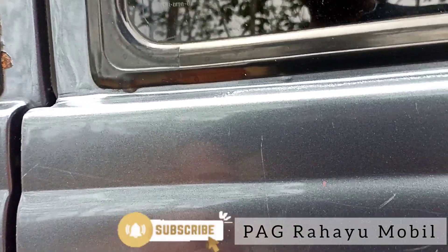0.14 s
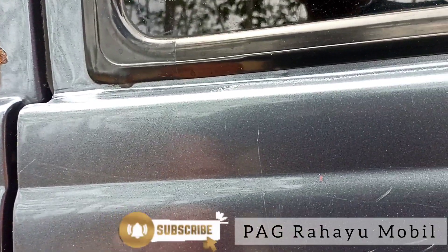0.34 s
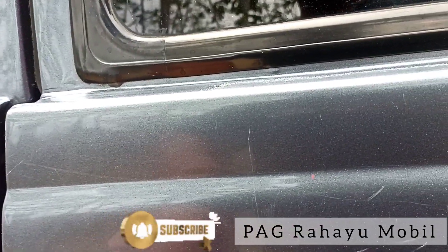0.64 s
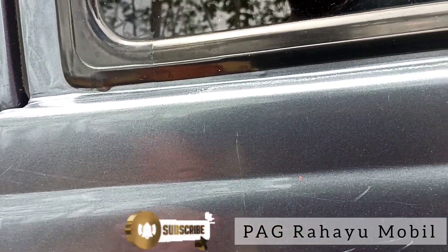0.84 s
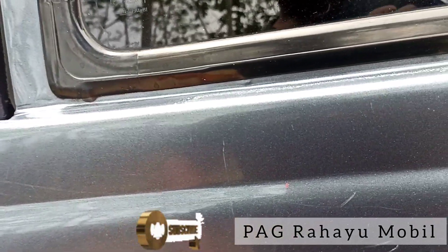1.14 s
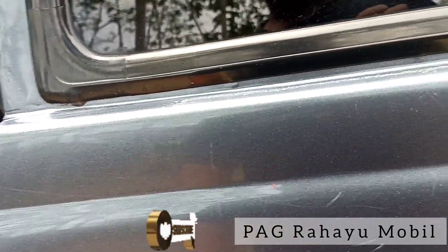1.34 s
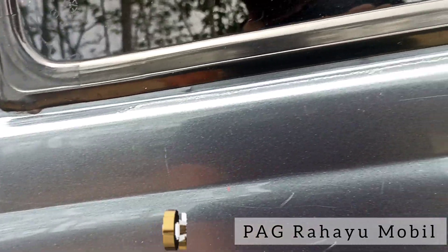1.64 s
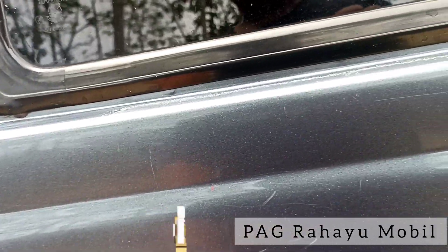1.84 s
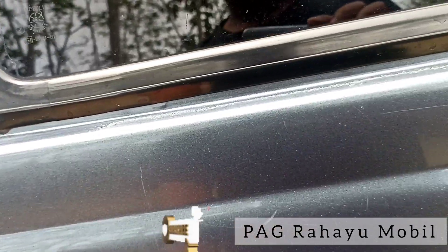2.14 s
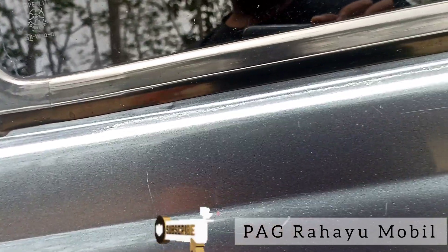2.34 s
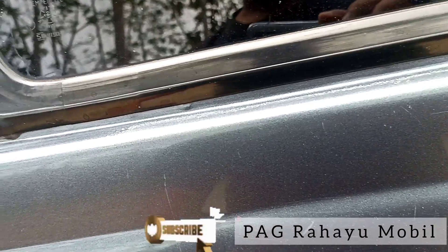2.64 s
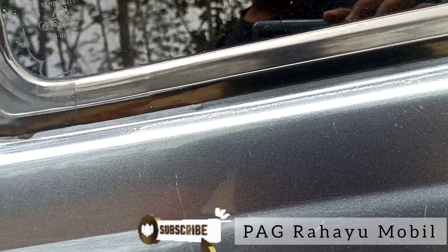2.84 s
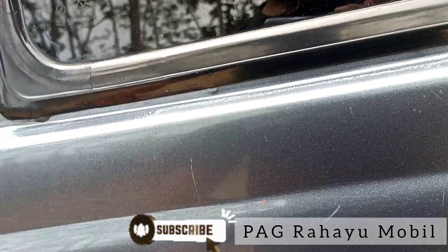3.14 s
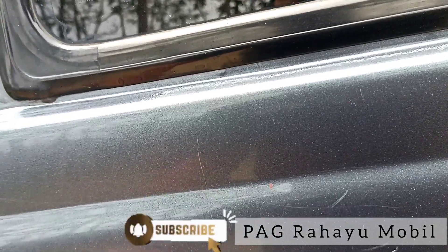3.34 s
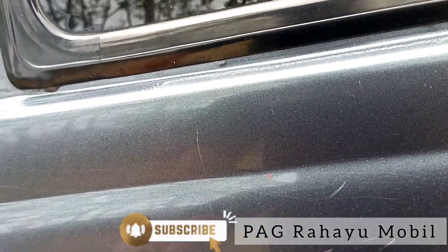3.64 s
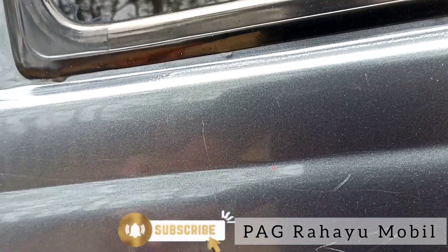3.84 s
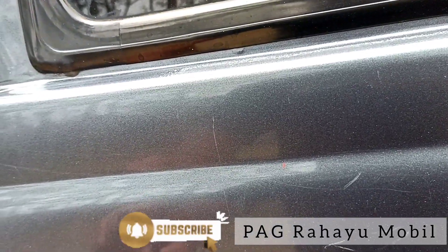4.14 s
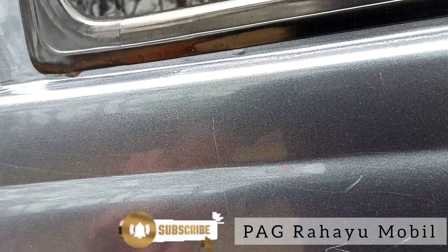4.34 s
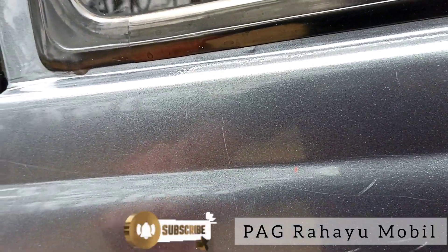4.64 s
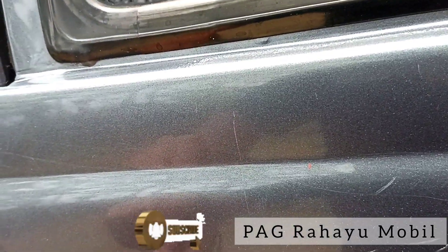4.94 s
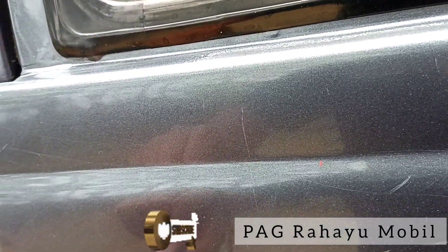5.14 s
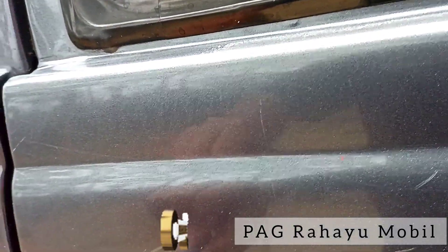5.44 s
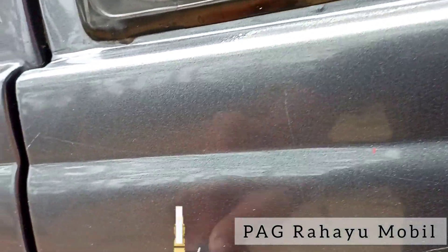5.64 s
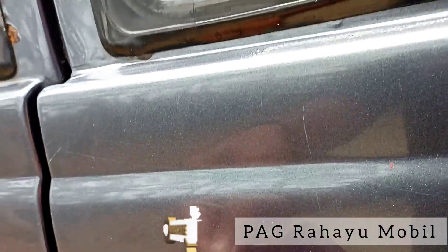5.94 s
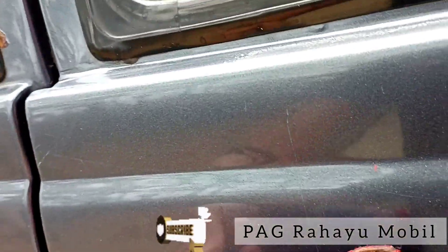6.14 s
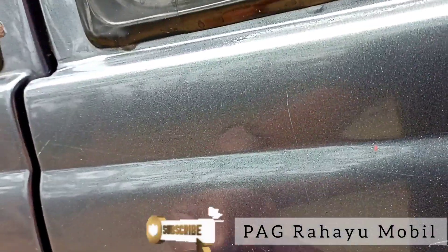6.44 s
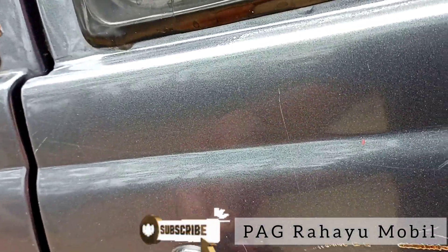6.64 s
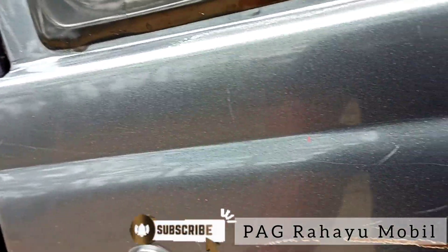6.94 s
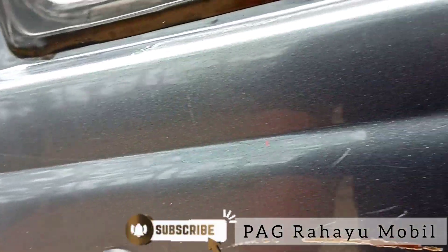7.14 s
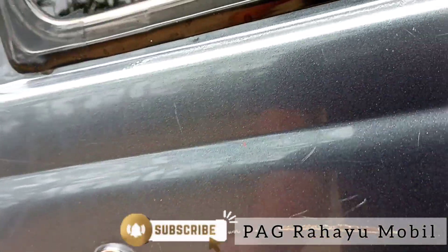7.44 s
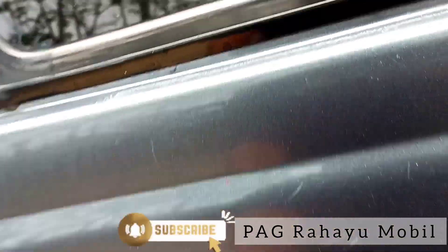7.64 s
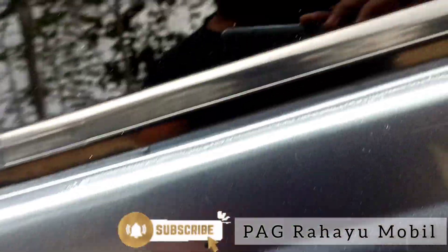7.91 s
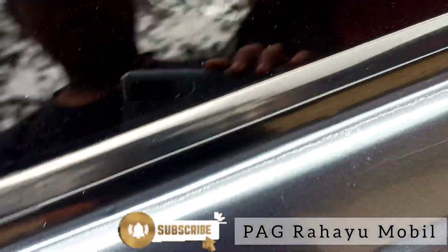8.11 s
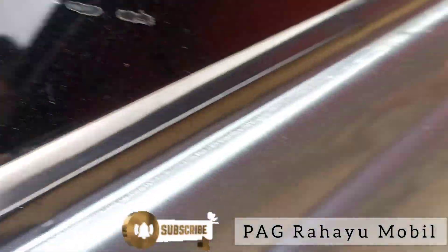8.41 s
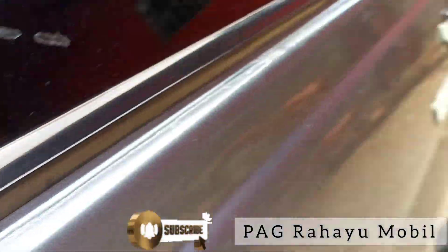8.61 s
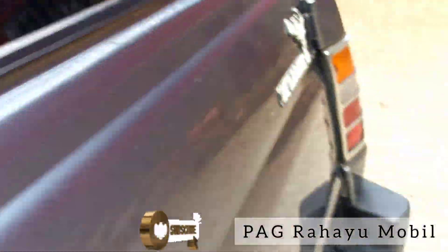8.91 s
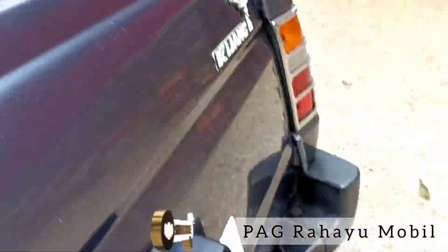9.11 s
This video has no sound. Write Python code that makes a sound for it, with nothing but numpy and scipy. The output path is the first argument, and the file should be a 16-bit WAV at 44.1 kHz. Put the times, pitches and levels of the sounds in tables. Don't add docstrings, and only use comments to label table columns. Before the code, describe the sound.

Close metallic clacks and booming door-panel blows come in bursts with quiet gaps, handle rubbing and creaking, with distant traffic and sparse faint birdsong behind.

```python
import sys
import numpy as np
from scipy import signal
from scipy.fft import rfft, irfft
from scipy.io import wavfile
from scipy.ndimage import uniform_filter1d

SR = 44100
rng = np.random.default_rng(int(sys.argv[2]) if len(sys.argv) > 2 else 0)


def decibels_to_gain(level_db):
    exponent = np.asarray(level_db, float) / 20
    return 10 ** exponent


def transcribe(u):
    v = np.clip(np.atleast_2d(u).T, -1, 1)
    q = np.round(v * 32767).astype(np.int16)
    wavfile.write(sys.argv[1], SR, q)


N = 408807

# start_s, peak_db, brightness_db, ring_hz, ring_time_factor
CLICKS = [(0.849, -33.5, -4, 3600, 0.85), (1.672, -25, 2, 5830, 0.38), (1.8227, -31.5, -16, 1300, .9),
          (2.2128, -19, -6.5, 2240, 1.4), (2.262, -14, -4, 800, 0.83), (2.6882, -47, 13, 6500, .4),
          (4.2723, -16, -7.5, 5400, 0.63), (4.398, -21, -14, 2120, 0.91), (4.4152, -20.5, -19, 1610, 1.2),
          (4.664, -16.5, -6.5, 1590, .7), (4.7458, -32.5, -20, 1050, .9), (4.812, -22.5, -9.5, 2040, 1.15),
          (4.887, -37, -11, 3490, .9), (5.2445, -36, -16, 1330, .6), (5.8366, -19, -13.5, 2850, 1),
          (6.05, -34, -43, 1380, 1.1), (6.4113, -32.5, -8.5, 1360, 0.79), (6.461, -15, -19.5, 2880, 0.76),
          (6.559, -32, -14, 1000, 1.1), (6.8626, -47, 3, 3500, .6), (6.9357, -42.5, -4, 2100, .6),
          (7.014, -37, -11, 2500, 0.87), (7.1544, -42, -8, 3300, .8), (7.528, -11.5, -18, 2100, 1.2),
          (7.6457, -11.5, -27, 1380, 1.06), (8.507, -39, -25, 1030, 0.55), (8.6063, -44, -30, 1200, .9),
          (8.9479, -33.5, 0, 2061, .6), (8.972, -18, -4, 1390, 0.83), (9.1368, -36.5, -28, 1034, 1)]
# start_s, peak_db, brightness_db, ring_hz
SLIDES = [(0.889, -33.5, -10, 2080), (1.603, -35.5, -22, 960), (1.7063, -36.5, -23, 1530),
          (1.738, -37.5, -9, 1530), (2.164, -34.5, -21, 1050), (2.8665, -45, -13, 1050),
          (4.4588, -37, -24, 1780), (4.641, -25.5, -27, 1800), (4.6554, -20.5, -17, 3580),
          (4.6933, -28.5, -17, 1040), (4.7837, -29.5, -40, 2050), (5.1269, -28, -24, 1030),
          (5.1368, -26, -4.5, 2100), (5.695, -34.5, -27, 1650), (6.1064, -29.5, -19, 1310),
          (6.117, -25.5, -20, 3300), (6.1278, -30.5, -19, 1350), (6.584, -40.5, -14, 1960),
          (7.23, -39, -10, 1004), (7.265, -37, -12, 1000), (7.286, -32, -4, 1130),
          (7.4186, -40.5, -9, 2200), (7.511, -26, -17, 920), (7.562, -19, -15, 1590),
          (7.5682, -10, -21, 2000), (7.575, -23, 2, 1630), (7.607, -22, -6.5, 1150),
          (7.895, -45.5, -26, 1030), (8.1212, -45, -9, 990), (8.797, -35.5, -10, 2280),
          (8.9943, -28.5, -26, 1260)]
# pitch_hz, level_db, t60_s
LATCH_MODES = [(1066, -4, 0.067), (1593, -0.5, 0.06), (1850, -2.5, 0.046), (2000, -5.5, 0.078),
               (2300, -7, 0.1), (3353, -6.5, 0.026), (3490, -1, 0.047), (3700, -1, 0.03),
               (2874, -8.5, 0.061), (723, -13, 0.1), (5690, -5, 0.035), (6500, -22, 0.055)]
# pitch_hz, level_db (per Hz)
CRACK_COLOUR = [(500, -14), (900, -3), (1300, -5), (1800, -1), (2300, -7), (2800, -7), (3500, -1),
                (4300, -16), (5000, -13), (5700, -7), (9000, -26), (12500, -18), (16400, -24)]
# pitch_hz, t60_factor
TAIL_FACTOR = [(700, 2.27), (2000, 0.93), (5000, 0.69), (9000, 0.75), (16000, 0.15)]
TOP_DB, TOP_SLOPE = -8.5, 1
CLICK_T60, SLIDE_T60 = 0.09, 0.063
BRIGHT_DAMPING = 0.019
SNAP_SHORTER = 0.07

# start_s, peak_db, ring_hz, ring_time_factor, extra_hardness_db
KNOCKS = [(1.446, -30, 235, 1, -2.5), (1.601, -19.5, 142, 1, -1), (1.672, -11.5, 298, 0.57, -1.5),
          (1.821, -19, 673, 0.64, -2), (2.211, -17.5, 165, 0.97, 1), (2.261, -1, 623, 0.79, -2),
          (2.817, -31.5, 170, 0.83, -1), (4.417, -24.5, 217, 0.88, -5), (4.699, -20, 280, 0.81, 2.5),
          (5.693, -28.5, 224, 1, 0.5), (5.836, -28.5, 154, 0.75, 1.5), (6.115, -17, 182, 0.71, 2),
          (6.549, -28.5, 156, 0.82, -1.5), (7.091, -32, 146, 0.98, -0.5), (7.238, -22, 199, 1, -1.5),
          (7.276, -16.5, 214, 1, -2.5), (7.286, -23, 890, 0.37, -.5), (7.511, -13, 698, 0.58, -1.5),
          (7.505, -14.5, 181, 1, -7), (7.528, 0.5, 443, 0.19, -.5), (7.565, -10, 174, 0.83, 2),
          (7.608, -13.5, 302, 0.4, 1), (7.645, -15.5, 120, 0.83, 3), (8.927, -25, 350, 1, -6),
          (8.973, 0, 297, 0.66, -1), (8.984, -8.5, 486, 0.67, -0.5), (7.546, -16, 350, 0.68, -1.5),
          (8.895, -31.5, 450, 0.52, -.5)]
# start_s, peak_db, ring_hz
THUDS = [(.874, -13.5, 162), (.886, -15.5, 157), (2.859, -24, 109), (4.278, -18.5, 165), (4.31, -27, 202),
         (4.667, -12, 198), (4.812, -24.5, 149), (5.134, -20, 158), (5.189, -22, 160), (5.43, -30.5, 159),
         (5.748, -25, 149), (6.229, -37, 177), (6.41, -19.5, 126.5), (7.33, -20.5, 232),
         (8.065, -35.5, 146)]
# pitch_hz, level_db
SKIN_MODES = [(80, -13.5), (125, -9.5), (160, -5.5), (187, -3), (226, -2.5), (253, -19), (283, -2),
              (335, -7.5), (361, -6.5), (425, 0), (468, -7.5), (506, -11), (549, -7.5), (608, -7.5),
              (680, -4.5), (775, -7), (885, -12), (1050, -12), (1250, -15)]
# pitch_hz, t60_s
SKIN_T60 = [(80, 0.44), (250, 0.57), (500, 0.33), (1200, 0.3)]
# pitch_hz, level_db, t60_s
ROD = (309, -26, 1.11)
ROD_S = 2.262
HARD_DB, HARD_DB_PER_OCTAVE = -4.5, 3
THUD_HARD_DB, THUD_RING = -20, 0.64

# start_s, level_db
RUBS = [
    [(1.58, -54), (1.77, -54), (1.97, -66)],
    [(2.8, -66), (3.05, -72)],
    [(5.66, -60), (5.8, -57.5)],
    [(6.5, -53), (6.64, -75)],
    [(7.0, -76), (7.2, -69), (7.35, -70), (7.52, -46.5)],
    [(8.09, -61.5), (8.3, -65.5), (8.64, -74)],
    [(8.78, -57.5), (8.92, -57), (9.05, -50.5), (9.2, -67)],
]
# pitch_hz, level_db (per Hz)
RUB_COLOUR = [(120, -9), (200, -4), (323, -1.5), (1180, -13.5), (2250, -25), (6550, -37.5), (8490, -40),
              (11600, -39), (13000, -31), (16500, -54)]
# start_s, peak_db, ring_hz
CREAKS = [(7.095, -40.5, 1290), (7.108, -43, 1090), (7.12, -52, 1400), (7.386, -39.5, 804),
          (8.01, -47.5, 800), (8.114, -39.5, 796), (8.135, -43, 700), (8.157, -42, 1300), (8.176, -37, 920),
          (8.19, -43, 1300), (8.2, -44, 800), (8.21, -49, 1200), (8.226, -43.5, 1000), (8.24, -49, 1200),
          (8.253, -49, 800), (8.264, -41, 1140), (8.276, -50, 1270), (8.292, -45, 1200),
          (8.307, -40.5, 900), (8.34, -54, 3560), (8.37, -46, 1396), (8.39, -51, 1100), (8.453, -43, 836),
          (8.469, -61, 3700), (8.54, -48.5, 1110), (8.571, -46.5, 1110), (8.598, -47, 1000),
          (8.632, -51, 1100), (8.7, -53, 1390), (8.75, -52, 900), (8.773, -47, 860), (8.806, -42, 2330),
          (8.813, -40, 3300), (8.821, -38, 2190), (8.876, -43, 3330), (8.89, -43, 1890), (8.9, -43, 1300),
          (9.101, -39.5, 2300), (9.196, -44, 2890), (9.22, -46, 3300)]
HINGE_HZ, HINGE_DB, SLIP_T60 = 3300, -21.5, 0.018
LAG = 19

# start_s, peak_db, ring_hz
TICKS = [(0.7577, -42.5, 6440), (0.85, -34, 12600), (2.6633, -47, 6860), (2.968, -48, 6500),
         (3.2316, -51, 12500), (3.353, -35.5, 12500), (3.3694, -42, 12400), (3.3872, -45, 6415),
         (3.4216, -46, 12500), (3.8717, -48, 12000), (5.707, -38.5, 13760), (5.719, -41, 6200),
         (6.4294, -50, 5860), (6.5592, -35, 13100), (7.05, -37, 6600), (7.0705, -37.5, 5540),
         (7.1247, -48, 6300), (8.509, -50, 6700), (8.985, -36, 6700), (8.997, -42, 6500),
         (8.797, -40, 11800), (9.0946, -31, 12300), (9.102, -36, 6160), (9.194, -37, 13500)]
# start_s, peak_db, ring_hz
TAPS = [(1.66, -42, 2100), (1.662, -48, 5900), (1.836, -49, 12500), (2.284, -41, 12000),
        (2.689, -39.5, 6300), (2.689, -36, 3800), (2.822, -46, 900), (2.848, -41, 800), (2.868, -42, 900),
        (2.925, -52, 6700), (2.938, -48, 4500), (2.972, -48, 4600), (3.067, -50, 4500), (4.55, -42, 1500),
        (4.692, -41, 5460), (4.83, -35, 1300), (5.287, -39.5, 1780), (5.405, -47, 1790), (5.59, -56, 7500),
        (5.755, -51, 5000), (5.77, -50, 4800), (7.675, -43, 1500), (7.7, -43, 1690), (6.58, -48, 5500),
        (4.786, -36, 1850), (5.715, -50, 7300), (6.394, -52, 9000), (6.403, -58, 8500), (6.53, -50, 2400),
        (6.542, -43, 2300), (6.594, -41, 2000), (7.545, -38, 5500), (7.58, -28, 5970), (7.662, -48, 7000),
        (8.572, -48, 1393), (8.793, -39, 604), (8.812, -39, 700), (8.96, -38, 1290)]

# start_s, pitch_hz, level_db
SONGS = [
    [(3.92, 2720, -68), (3.96, 2440, -55.5), (4.02, 2180, -64), (4.075, 1920, -57), (4.095, 1780, -66)],
    [(6.975, 3450, -66), (6.995, 3200, -64), (7.012, 2800, -52.5), (7.03, 2250, -59), (7.05, 1980, -64),
     (7.09, 1880, -59), (7.13, 1940, -59), (7.145, 2110, -63), (7.195, 2070, -59), (7.225, 2510, -51)],
    [(8.135, 2600, -70), (8.17, 2626, -57), (8.245, 2680, -66), (8.3, 2630, -64), (8.4, 2480, -55),
     (8.43, 2465, -64), (8.46, 2690, -73)],
    [(8.605, 2980, -74), (8.63, 3300, -64), (8.646, 3454, -56), (8.68, 3370, -71), (8.74, 3390, -71),
     (8.795, 3470, -66)],
]
# start_s, length_s, first_pitch_hz, last_pitch_hz, level_db
BIRD_NOTES = [(2.125, .13, 8000, 6500, -64), (3.745, .025, 2950, 2980, -60), (3.8, .045, 2900, 3150, -61),
              (3.835, .04, 4750, 3950, -63), (4.45, .035, 6960, 5800, -64), (4.975, .035, 4540, 3500, -62),
              (5.34, .04, 4450, 4200, -66), (5.74, .06, 4800, 4400, -69), (6.005, .025, 3630, 4600, -66),
              (6.025, .07, 4600, 3300, -63), (8.64, .09, 3300, 3260, -72), (3.02, .06, 7600, 7500, -66),
              (5.35, .04, 3600, 3500, -64), (5.71, .035, 7350, 7300, -64), (6.345, .035, 6600, 5600, -64),
              (6.8, .045, 6900, 5500, -65), (8.85, .04, 3450, 3430, -60), (4.815, .015, 6600, 5600, -58)]
FAR_DB = -8
FADE_DB = -9
# start_s, chirps_per_s, level_db
CRICKET = [
    (0.0, 15.4, -84),
    (2.0, 14.6, -81.5),
    (3.8, 14.6, -78),
    (5.0, 17.5, -86.5),
    (5.7, 13, -84),
    (7.5, 15.8, -80.5),
    (9.27, 15.6, -81),
]
CRICKET_HZ = 6480

# start_s, pitch_hz, level_db
ENGINES = [
    [(0, 95.8, -43), (.9, 93.9, -54.5), (1.2, 92.5, -56)],
    [(1.5, 94, -49), (2.9, 91.7, -52.5), (4.3, 91.2, -55), (5, 89, -58)],
    [(2.9, 232.8, -48), (3.35, 235.7, -51.5), (4.3, 245.7, -58)],
    [(0, 440, -52), (.3, 431, -53)],
]
# start_s, level_db
TRAFFIC = [(0, 4.5), (.7, 3), (1.3, 1), (2.6, 2), (3.5, 1), (4.2, -0.5), (5.0, -0.4), (5.6, -1.5),
           (6.8, -3), (7.5, 1.5), (7.9, -3), (8.7, -4.5), (9.27, 3.5)]
# pitch_hz, level_db (per Hz)
AIR_COLOUR = [(30, -38), (50, -20), (80, -42), (120, 1), (200, -1), (400, -12), (630, -21), (1600, -23),
              (3300, -28.5), (5000, -39.5), (6300, -35), (8000, -44), (11000, -45.5), (12300, -42.5),
              (15700, -47), (16000, -71)]
# pitch_hz, likeness (-1 to 1)
LIKENESS = [(60, 0.67), (130, 0.97), (290, 0.88), (640, 0.35), (1410, -0.22), (3100, 0.088), (6820, 0.07),
            (15000, 0.0058)]
RUMBLE_SHARE, AIR_SHARE, FIZZ_SHARE = 0.28, 1.2, 0.87
# pitch_hz, left_minus_right_db
PORTS = [(60, 0.5), (200, -2.5), (500, 0.5), (1000, -5), (1900, -6), (3800, -6), (7500, -9.5), (10000, 2),
         (12500, 13), (16000, -1)]


def evened(x):
    return x / np.sqrt(np.mean(x ** 2) + 1e-20)


def topped(x):
    return x / (np.abs(x).max() + 1e-20)


def read(points, hz):
    f, value = np.transpose(points)
    return np.interp(np.log(hz + 1), np.log(f + 1), value)


def add(mix, s, sound):
    part = mix[round(s * SR):][:len(sound)]
    part += sound[:len(part)]


def unroll(rows):
    s, *columns = np.transpose(rows)
    t = np.arange(s[0], s[-1], 1 / SR)
    return s[0], [np.interp(t, s, c) for c in columns]


def shaped(x, gain):
    return irfft(rfft(x) * gain(np.fft.rfftfreq(len(x), 1 / SR)), len(x))


def above(hz, edge_hz):
    return 1 / (1 + (edge_hz / (hz + 1)) ** 10)


def rings(modes, t, stretch, detune, scatter_db):
    hz, db, t60 = np.transpose(modes)[:, :, None]
    off, lift, phase = rng.standard_normal((3, len(modes), 1))
    level = decibels_to_gain(db + scatter_db * lift - 60 * t / (t60 * stretch))
    return level * np.sin(2 * np.pi * (hz * (1 + detune * off) * t + phase))


def echoes(length, density):
    k = np.arange(5 * length)
    taps = rng.standard_normal((2, len(k))) * np.exp(-k / length)
    taps = taps * (rng.random((2, len(k))) < density)
    return taps / np.linalg.norm(taps, axis=1, keepdims=True)


def reflected(x, length, density):
    return signal.oaconvolve(x[None], echoes(length, density), axes=1)[:, :N]


def door():
    latch, skin = latch_parts() + rub() + slips(CREAKS), door_skin()
    treble_loss = lambda f: f / (f + 500) / (1 + (f / 5000) ** 2)
    scattered = reflected(shaped(latch + skin, treble_loss), 900, .05)
    latch = latch + decibels_to_gain(-3) * reflected(latch, 90, .2)
    direct = np.array([np.roll(latch[0], LAG) + np.roll(skin, 7), latch[1] + skin])
    return direct + decibels_to_gain(-1.0) * scattered


def latch_parts():
    x = np.zeros(N)
    for s, *row, stretch in CLICKS:
        add(x, s, click(*row, t60=CLICK_T60 * stretch, rise_s=0.00046,
                        crack_db=8.5, ring_db=-7, snap_db=3.5))
    for s, *row in SLIDES:
        add(x, s - .002, click(*row, t60=SLIDE_T60, rise_s=0.0052,
                               crack_db=-21, ring_db=-17.5, snap_db=-30))
    return x


def click(db, bright_db, ring_hz, t60, rise_s, crack_db, ring_db, snap_db):
    t = np.arange(6400) / SR
    top_db = TOP_DB + TOP_SLOPE * bright_db
    t60 = t60 * (1 - BRIGHT_DAMPING * bright_db)

    hz, at = np.fft.rfftfreq(128, 1 / SR)[:, None], np.arange(202) * 32 / SR
    a, b = rng.standard_normal((202, 65, 2)).T
    decay = decibels_to_gain(-60 * at / (max(t60, .01) * read(TAIL_FACTOR, hz)))
    bump_db = 8 * np.exp(-(np.log((hz + 1) / ring_hz) / 0.068) ** 2)
    spectra = (a + 1j * b) * decibels_to_gain(bump_db) * decay
    rattle = signal.istft(spectra, nperseg=128, noverlap=96)[1][:len(t)]
    rattle = shaped(rattle, lambda f: decibels_to_gain(read(CRACK_COLOUR, f)))

    ringing = rings(LATCH_MODES, t, 0.98, 0.01, 2.6).sum(0)
    mode_hz, mode_db, mode_t60 = np.transpose(LATCH_MODES)[:, :, None]
    snap = decibels_to_gain(mode_db - 60 * t / (mode_t60 * SNAP_SHORTER)) * np.sin(2 * np.pi * mode_hz * t)
    x = topped(rattle) + decibels_to_gain(ring_db) * topped(ringing) + decibels_to_gain(snap_db) * topped(snap.sum(0))

    envelope = np.minimum(t / rise_s, 1) * (1 + decibels_to_gain(crack_db) * np.exp(-t / 0.0015))
    envelope = envelope * np.minimum((t[-1] - t) / .02, 1)
    body = topped(envelope * shaped(x, lambda f: above(f, 390) - above(f, 4000)))
    bright = topped(envelope * shaped(x, lambda f: above(f, 3730) - above(f, 10300)))
    top = topped(envelope * shaped(x, lambda f: above(f, 8800)))
    return decibels_to_gain(db) * (body + decibels_to_gain(bright_db) * bright + decibels_to_gain(top_db) * top)


def door_skin():
    x = np.zeros(N)
    for s, db, hz, stretch, extra_db in KNOCKS:
        hard_db = min(HARD_DB + HARD_DB_PER_OCTAVE * np.log2(hz / 200) + extra_db, 0)
        add(x, s, knock(db, hz, hard_db, stretch, spot_db=7.0, swing=1.57))
    for s, db, hz in THUDS:
        add(x, s, knock(db, hz, THUD_HARD_DB, THUD_RING, spot_db=12, swing=0.88))
    hz, db, t60 = ROD
    t = np.arange(SR) / SR
    add(x, ROD_S, decibels_to_gain(db - 60 * t / t60) * np.sin(2 * np.pi * hz * t))
    return signal.sosfilt(signal.butter(3, 82, "high", fs=SR, output="sos"), x)


def knock(db, ring_hz, hard_db, stretch, spot_db, swing):
    crowd_hz = rng.uniform(8, 37, 110) ** 2
    crowd = np.array([crowd_hz, read(SKIN_MODES, crowd_hz) - 3]).T
    hz, level_db = np.vstack([SKIN_MODES, crowd]).T
    t = np.arange(2400) * 8 / SR
    table = np.array([hz, level_db, read(SKIN_T60, hz)]).T
    modes = rings(table, t, np.clip(stretch, .1, 3), .012, 2.2)
    hz = hz[:, None]
    octave = np.log(hz / ring_hz)
    spot_gain_db = spot_db * np.exp(-(octave / 0.13) ** 2)
    modes = modes * decibels_to_gain(spot_gain_db + 1.02 * hard_db * np.clip(octave, 0, 1))
    modes = modes * (1 + swing * np.exp(-t / 0.0064)) * np.minimum(t * hz / 1.5, 1)
    low = topped((modes * (hz < 380)).sum(0))
    high = topped((modes * (hz > 380)).sum(0))
    low_share = np.sqrt(max(1 - decibels_to_gain(hard_db) ** 2, .1))
    blow = topped(low * low_share + decibels_to_gain(hard_db) * high)
    return decibels_to_gain(db - 3) * signal.resample_poly(blow, 8, 1)


def rub():
    strength = decibels_to_gain(4 * np.minimum(rng.exponential(1, N), 2))
    catches = strength * (rng.random(N) < 60 / SR)
    grip = 1 + 1.36 * signal.lfilter([1], [1, -np.exp(-1 / (0.0017 * SR))], catches)
    hiss = shaped(grip * rng.standard_normal(N), lambda f: decibels_to_gain(read(RUB_COLOUR, f)) * above(f, 66))
    hiss = hiss / shaped(hiss, lambda f: above(f, 890) - above(f, 4000)).std()
    x = np.zeros(N)
    for rows in RUBS:
        s, (db,) = unroll(rows)
        stroke = hiss[round(s * SR):][:len(db)]
        add(x, s, decibels_to_gain(db + 1.0) * stroke * signal.windows.tukey(len(db), .2))
    return x


def slips(events):
    x, t = np.zeros(N), np.arange(1600) / SR
    near = lambda f, centre_hz: 1 / (1 + (np.log((f + 1) / centre_hz) / 0.21) ** 2) ** 2
    for s, db, hz in events:
        puff = rng.standard_normal(len(t)) * decibels_to_gain(-60 * t / SLIP_T60)
        puff = shaped(puff, lambda f: near(f, hz) + decibels_to_gain(HINGE_DB) * near(f, HINGE_HZ))
        add(x, s, decibels_to_gain(db + 2.5) * np.linspace(1, 0, len(t)) ** 2 * topped(puff))
    return x


def fingers():
    ticks = np.zeros(N)
    for s, *row in TICKS:
        add(ticks, s, tick(*row))
    taps = slips(TAPS)
    left = ticks + decibels_to_gain(-1.0) * np.roll(taps, LAG)
    right = decibels_to_gain(-3.5) * np.roll(ticks, 6) + decibels_to_gain(2.5) * taps
    return np.array([left, right])


def tick(db, ring_hz):
    t = np.arange(1500) / SR
    snap = rng.standard_normal(len(t)) * decibels_to_gain(-60 * t / 0.031)
    snap = shaped(snap, lambda f: above(f, 4100) * decibels_to_gain(read(CRACK_COLOUR, f) / 3))
    ring = 0.43 * decibels_to_gain(-60 * t / 0.039) * np.sin(2 * np.pi * ring_hz * t)
    return decibels_to_gain(db) * (topped(snap) + ring)


def bird_notes():
    return [[(s, first_hz, db + FAR_DB), (s + length, last_hz, db + FAR_DB - FADE_DB)]
            for s, length, first_hz, last_hz, db in BIRD_NOTES]


def whistles(tables, waver, smooth_s):
    x = np.zeros(N)
    for rows in tables:
        s, (hz, db) = unroll(rows)
        drift = uniform_filter1d(rng.standard_normal(len(hz)), round(smooth_s * SR))
        level = np.sqrt(2) * decibels_to_gain(db) * (1 + waver * evened(drift))
        tone = np.sin(2 * np.pi * np.cumsum(hz) / SR)
        add(x, s, level * tone * signal.windows.tukey(len(hz), .15))
    return x


def cricket():
    s, (rate, db) = unroll(CRICKET)
    beat = (np.cumsum(rate) / SR + 0.33) % 1
    rough = evened(uniform_filter1d(rng.standard_normal(len(db)), 120))
    chirp = np.exp(-((beat - .5) / 0.25) ** 2) * (3.5 + 1.5 * rough)
    db = db + 1.5 * evened(uniform_filter1d(rng.standard_normal(len(db)), 9000))
    tone = np.sin(2 * np.pi * np.cumsum(CRICKET_HZ - 120 * (beat - .5)) / SR)
    x = np.zeros(N)
    add(x, s, decibels_to_gain(db + 4.5) * chirp * tone)
    return x


def air():
    frames, hz = N // 256 + 5, np.fft.rfftfreq(1024, 1 / SR)
    a, b, c, d, patches = rng.standard_normal((frames, 513, 5)).T
    patches = evened(uniform_filter1d(uniform_filter1d(patches, 8, 0), 12, 1))
    same = np.clip(read(LIKENESS, hz), -1, 1)[:, None]
    left = a + 1j * b
    right = same * left + np.sqrt(1 - same ** 2) * (c + 1j * d)
    spectra = np.array([left, right]) * decibels_to_gain(1.0 * patches)
    traffic_db = np.interp(np.arange(frames) * 256 / SR, *np.transpose(TRAFFIC))
    low, high = 1 - above(hz, 420), above(hz, 7600)
    shares = np.array([low, 1 - low - high, high]).T
    change = decibels_to_gain(np.outer([RUMBLE_SHARE, AIR_SHARE, FIZZ_SHARE], traffic_db))
    field = decibels_to_gain(read(AIR_COLOUR, hz))[:, None] * (shares @ change)
    noise = signal.istft(spectra * field, nperseg=1024, noverlap=768)[1][:, :N]
    return decibels_to_gain(-44.5) * evened(noise)


def scene():
    bird, insect = whistles(bird_notes() + SONGS, 0.47, 0.004), cricket()
    far = np.array([np.roll(bird, -2) + np.roll(insect, 2), bird + insect])
    far = far + decibels_to_gain(-1.0) * reflected(bird, 1700, 0.12)
    engines = whistles(ENGINES, 0.2, 0.11)
    return door() + fingers() + far + engines + air()


def band_limit(x):
    return signal.sosfilt(signal.butter(12, 16650, fs=SR, output="sos"), x)


def record(dry):
    left = shaped(dry[0], lambda f: decibels_to_gain(read(PORTS, f) / 2))
    right = shaped(dry[1], lambda f: decibels_to_gain(-read(PORTS, f) / 2))
    ceiling = 1.5
    rounded = ceiling * np.tanh(np.array([left, right]) / ceiling)
    lowpass = signal.firwin(255, 16500, fs=SR)
    mix = signal.oaconvolve(rounded, lowpass[None], "same")
    return band_limit(mix)


dry = scene()
out = record(dry)
transcribe(out)
```